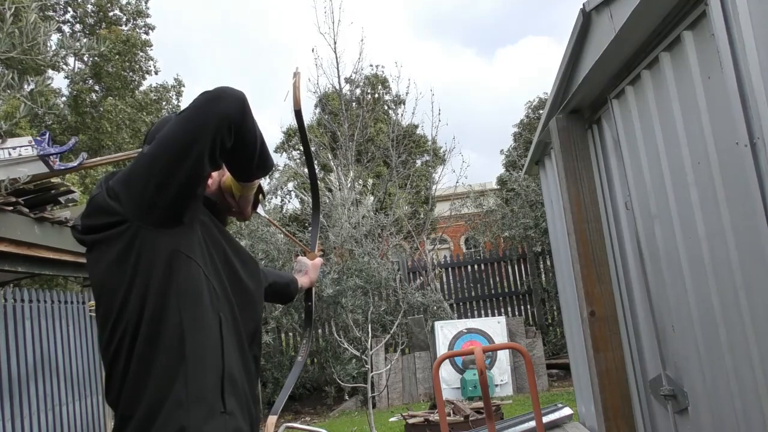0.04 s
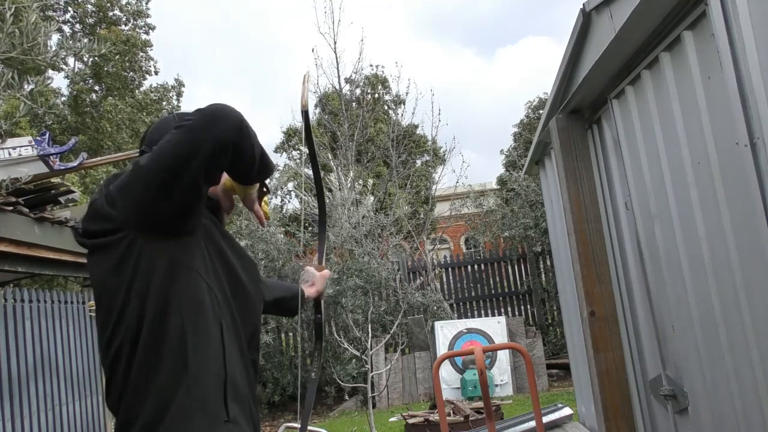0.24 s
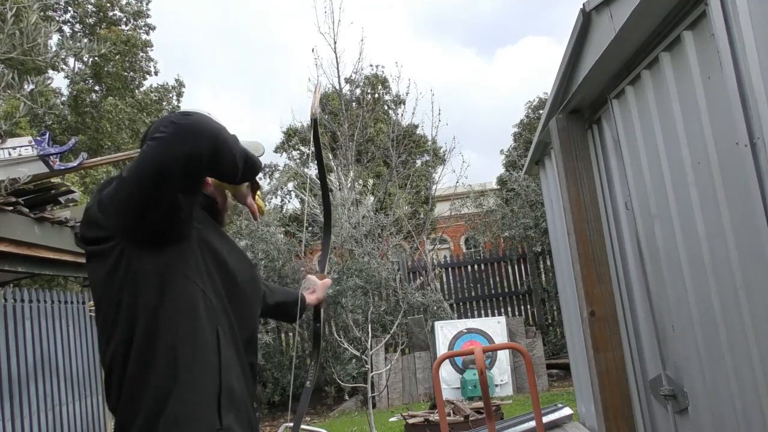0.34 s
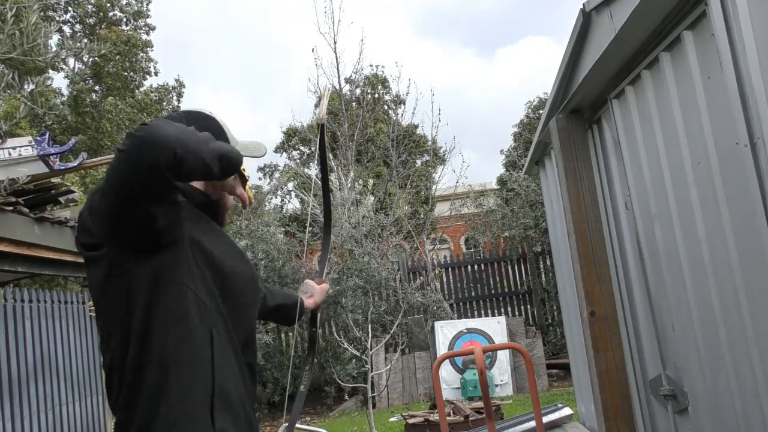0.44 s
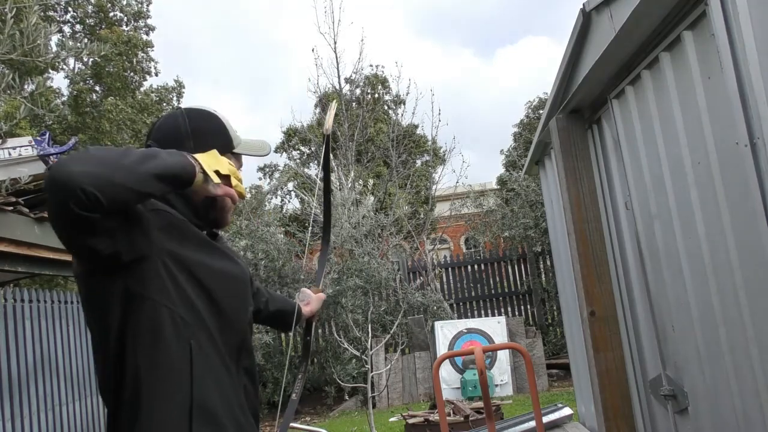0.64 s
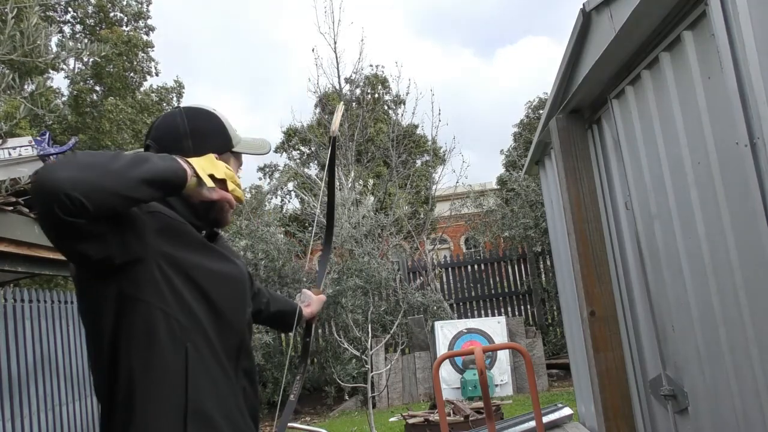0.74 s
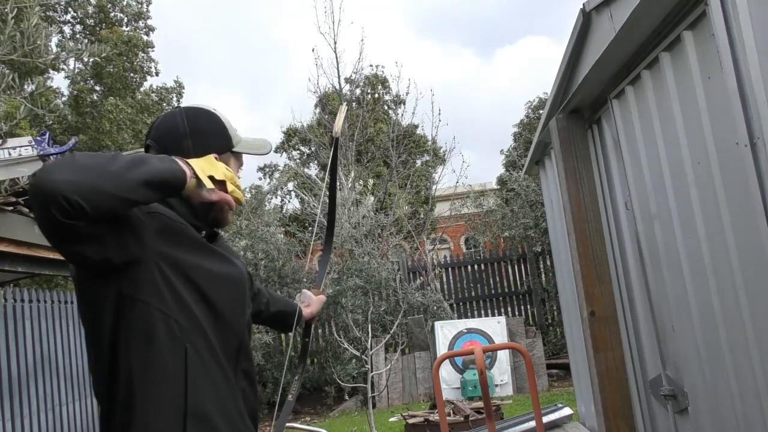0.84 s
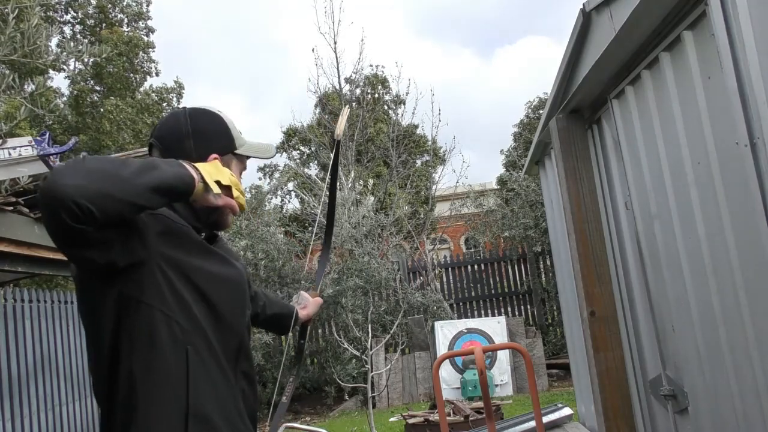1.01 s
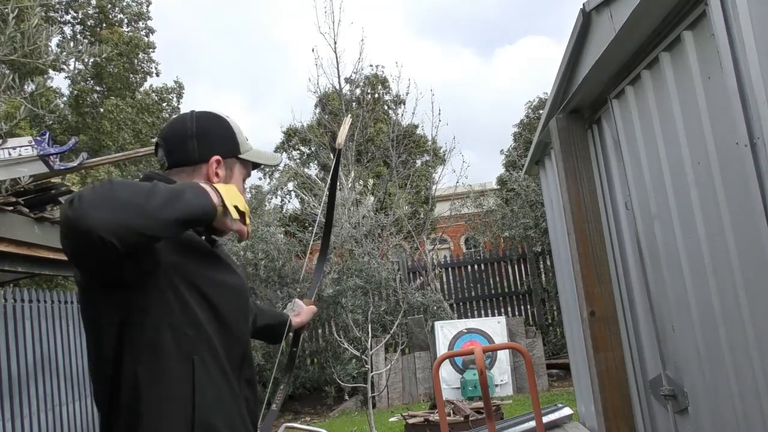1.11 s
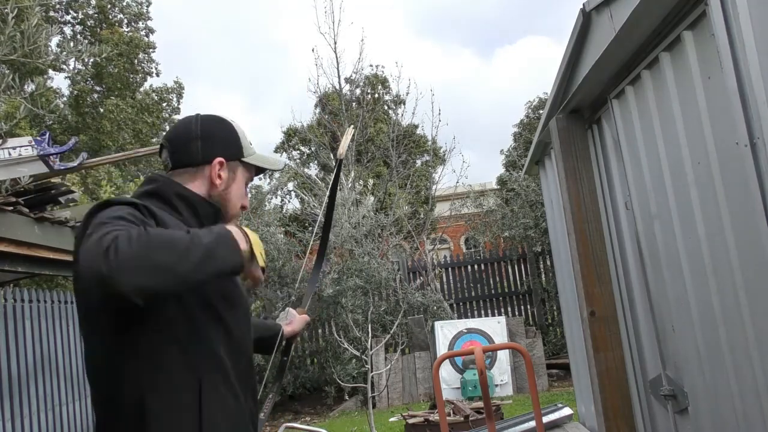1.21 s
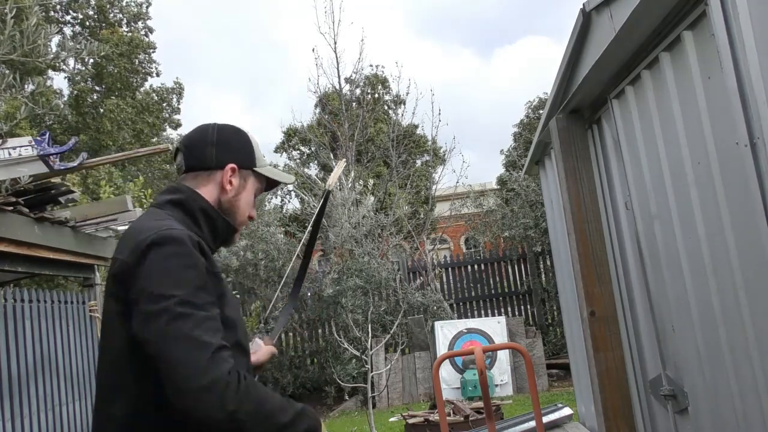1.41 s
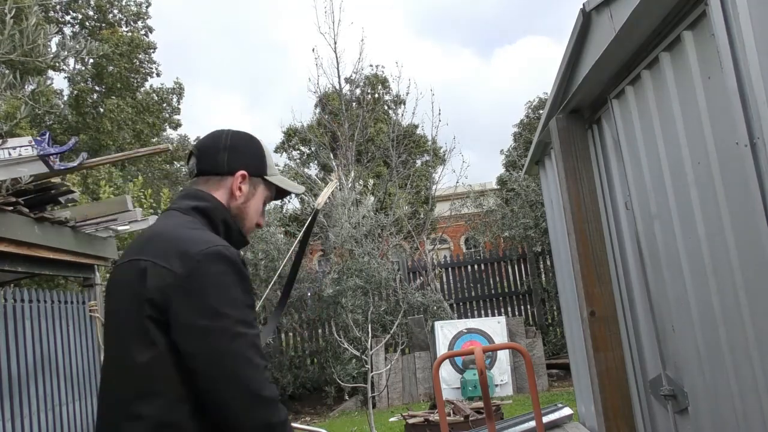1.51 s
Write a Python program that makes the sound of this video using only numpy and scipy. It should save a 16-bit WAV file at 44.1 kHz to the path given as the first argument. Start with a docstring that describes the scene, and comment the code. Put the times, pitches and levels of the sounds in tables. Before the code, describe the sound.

A bow fires with a sharp string clack, and the arrow cracks into a foam target with an echoing thump. A jacket then swishes near the microphone, while birds chatter faintly to the right in a backyard.

```python
"""Backyard: an archer looses a recurve bow. The arrow scrapes off the rest, the string clacks home
and the limbs ring. 0.2 s later the point cracks into a foam target, whose damped modes thump;
shed, fences and houses throw the thump back. His jacket swishes as the arm drops and gear ticks.
A flock of birds chatters in short whistles from trees to the right, over faint outdoor air."""
import sys
import numpy as np
from scipy import signal
from scipy.fft import rfft, irfft, next_fast_len
from scipy.io import wavfile
from scipy.ndimage import uniform_filter1d

SR = 44100
rng = np.random.default_rng(int(sys.argv[2]) if len(sys.argv) > 2 else 0)


def transcribe(u):
    """Save the signal u as a 16-bit wav file named by the first command-line argument.

    u: samples, shape (n,) or (channels, n), limited to [-1, 1]; the rate is SR.
    q: integer samples, one column per channel.
    """
    v = np.clip(np.atleast_2d(u).T, -1, 1)
    q = np.round(v * 32767).astype(np.int16)
    wavfile.write(sys.argv[1], SR, q)


N = 68355

# left-right coherence of diffuse and of near sound: f/Hz, coherence
DIFFUSE_COHERENCE = [(30, 0.067), (100, 0.73), (500, 0.7), (1500, 0.56), (4000, 0.27), (12000, 1)]
NEAR_COHERENCE = [(200, 0.99), (2000, 0.85), (12000, 1)]


def amp(db):
    """dB to gain."""
    return 10 ** (np.asarray(db) / 20)


def unit(x):
    """Scale to rms 1."""
    return x / np.sqrt(np.mean(x ** 2) + 1e-20)


def along(points, hz):
    """Interpolate (f/Hz, value) points over log frequency."""
    f, v = np.transpose(points)
    return np.interp(np.log(hz + 1), np.log(f + 1), v)


def since(start_s):
    """Seconds since start_s, zero before."""
    return np.maximum(np.arange(N) / SR - start_s, 0)


def fade(t, t60_s):
    """Exponential decay, 60 dB in t60_s."""
    return np.exp(-np.log(1000) * t / t60_s)


def filtered(x, response):
    """Apply the frequency response response(hz)."""
    size = next_fast_len(N + SR // 2)
    return irfft(rfft(x, size) * response(np.fft.rfftfreq(size, 1 / SR)), size)[..., :N]


def noise(colour_db, coherence):
    """Stereo noise, rms 1, with spectrum colour_db(hz)."""
    def mid_side_gains(hz):
        angle = np.arccos(np.clip(along(coherence, hz), -1, 1)) / 2
        return amp(colour_db(hz)) * [np.cos(angle), np.sin(angle)]
    mid, side = filtered(rng.standard_normal((2, N)), mid_side_gains)
    return unit(np.array([mid + side, mid - side]))


def puff(start_s, db, pitch_hz, t60_s, half_width_oct=0.8):
    """Decaying noise band around one pitch."""
    def band_db(hz):
        return -10 * np.log10(1 + (np.log2((hz + 1) / pitch_hz) / half_width_oct) ** 4)
    t = since(start_s)
    return amp(db) * (t > 0) * fade(t, t60_s) * noise(band_db, NEAR_COHERENCE)


def bursts(rows, colour, shelf_hz=6000):
    """Noisy contacts, each with its own attack, decay and treble shelf."""
    out = np.zeros((2, N))
    for start_s, db, attack_s, t60_s, treble_db in rows:
        t = since(start_s)
        hiss = noise(lambda hz: along(colour, hz) + treble_db * hz ** 4 / (hz ** 4 + shelf_hz ** 4),
                     NEAR_COHERENCE)
        out += amp(db) * (1 - np.exp(-t / attack_s)) * fade(t, t60_s) * hiss
    return out


def knocks(rows, colour, size=4096):
    """Hard contacts: one impulse each, ringing briefly in the body's colour."""
    cepstrum = irfft(np.log(amp(along(colour, np.fft.rfftfreq(size, 1 / SR)))))
    fold = np.r_[1, np.full(size // 2 - 1, 2), np.zeros(size // 2)]  # to minimum phase
    ring = irfft(np.exp(rfft(cepstrum * fold)))
    impulses = np.zeros(N)
    for start_s, db in rows:
        impulses[int(start_s * SR)] += amp(db)
    return signal.fftconvolve(impulses, ring / np.abs(ring).max())[:N]


def swell(start_s, hz, db, rise_s, sharpness):
    """Damped mode that peaks after rise_s and dies away."""
    t = since(start_s)
    envelope = (t / rise_s * np.exp(1 - t / rise_s)) ** sharpness
    return amp(db) * envelope * np.sin(2 * np.pi * hz * t)


def yard_tail(colour_db, build_s):
    """Diffuse response of the yard; each frequency decays at its own rate."""
    decay = [(120, 1), (300, 1), (600, 0.41), (1400, 0.4), (3500, 0.42), (10000, 0.31)]  # reverberation: f/Hz, t60/s
    hz, t, spectra = signal.stft(noise(colour_db, DIFFUSE_COHERENCE), SR, nperseg=512)
    _, tail = signal.istft(spectra * fade(t, along(decay, hz)[:, None]), SR, nperseg=512)
    return tail[:, :N] * (1 - np.exp(-since(0) / build_s))


def yard(x, wet_db, build_s=0.014):
    """The part of x scattered by the yard."""
    response = yard_tail(np.zeros_like, build_s)
    response /= np.linalg.norm(response[0])
    return amp(wet_db) * signal.fftconvolve(np.atleast_2d(x), response, axes=1)[:, :N]


def air(db=-51):
    """Faint, steady outdoor noise."""
    colour = [(15, -36), (30, -2.5), (60, -4.5), (140, -2), (450, -8.5), (800, -20), (1240, -10),
              (2600, -15), (4500, -10.5), (6200, -22), (11800, -25), (15500, -32)]  # spectrum: f/Hz, level/dB
    return amp(db) * noise(lambda hz: along(colour, hz), DIFFUSE_COHERENCE)


def chirp(start_s, length_s, db, start_hz, middle_hz, end_hz, roughness=0.022):
    """One arched whistle, slightly hoarse from pitch jitter."""
    u = np.linspace(0, 1, max(int(length_s * SR), 8))
    arch_hz = np.polyval(np.polyfit([0, 0.5, 1], [start_hz, middle_hz, end_hz], 2), u)
    jitter = unit(uniform_filter1d(rng.standard_normal(N // 4), size=30))[:len(u)]
    pitch_hz = arch_hz * (1 + roughness * jitter)
    envelope = np.sqrt(2 * np.abs(np.sin(np.pi * u)))
    call = amp(db) * envelope * np.sin(2 * np.pi * np.cumsum(pitch_hz) / SR)
    return np.pad(call, (max(int(start_s * SR), 0), N))[:N]


def birds(chirps_per_s=130, chirp_s=0.0241, centre_hz=3940, spread=0.16, glide=0.0795, pan_db=3):
    """Flock to the right: overlapping chirps blurred by distance, plus a few nearer calls."""
    levels = [(0, -44.5), (.15, -47.5), (.25, -45.5), (.39, -46.5), (0.468, -51), (.56, -43.5),
              (.63, -53.5), (.74, -50.5), (.98, -56), (1.09, -50), (1.16, -46.5), (1.21, -54.5),
              (1.26, -45.5), (1.35, -47), (1.45, -50), (1.55, -56)]  # flock loudness: t/s, level/dB
    colour = [(1500, -71), (2700, -6), (3150, 1), (3600, 1.5), (4600, -1), (5300, -5), (6500, -13),
              (9000, -41)]  # flock spectrum: f/Hz, level/dB
    calls = [(0.554, 0.027, -55, 4070, 4370, 4050), (.556, 0.06, -49.5, 3620, 3490, 3220),
             (.628, 0.065, -51.5, 3250, 3090, 3180), (.697, 0.032, -53, 5230, 4780, 4700),
             (0.71, .038, -56.5, 6150, 5910, 5820), (0.868, 0.038, -55, 5050, 5330, 5340),
             (0.988, 0.024, -54, 6050, 5320, 4000), (1.337, .025, -52.5, 5280, 5340, 5230),
             (1.393, .016, -45.5, 5000, 3944, 3550), (1.421, 0.03, -45, 3430, 3894, 3490),
             (1.423, .055, -48.5, 4500, 4760, 4620), (1.069, .04, -55.5, 4640, 4776, 4700)]  # near calls: t/s, length/s, level/dB, start/Hz, middle/Hz, end/Hz
    draws = rng.standard_normal((int(chirps_per_s * N / SR), 5))
    flock = np.zeros(N)
    for k, draw in enumerate(draws):
        start_s = (k + rng.random()) / chirps_per_s
        level_db = 3 * draw[0]
        contour_hz = centre_hz * np.exp(spread * draw[1] + glide * draw[2:])
        flock += chirp(start_s, chirp_s, level_db, *contour_hz)
    flock = unit(filtered(flock + yard(flock, wet_db=-1.5), lambda hz: amp(along(colour, hz))))
    murmur = amp(-5.5) * noise(lambda hz: along(colour, hz), DIFFUSE_COHERENCE)
    chatter = amp(np.interp(since(0), *np.transpose(levels))) * unit(flock + murmur)
    near = sum(chirp(*row) for row in calls)
    return (chatter + near + yard(near, wet_db=-4, build_s=0.0031)) * amp([[-pan_db], [pan_db]])


def archer():
    """The sleeve swishes, gear ticks and the archer shifts with soft low bumps."""
    strokes = [(.583, -46, 0.0062, 0.34, -17), (.7565, -34.5, 0.0025, 0.14, 3.5),
               (.773, -33, 0.0014, 0.17, 1.5), (.895, -42, 0.016, 0.23, -10),
               (.928, -41.5, 0.0085, 0.12, 14), (.99, -49.5, 0.011, 0.29, 1),
               (1.215, -44, 0.0067, 0.17, -8.5)]  # sleeve strokes: t/s, level/dB, attack/s, t60/s, treble/dB
    cloth_colour = [(300, 5), (800, -8.5), (2000, 1.5), (4000, -2), (6000, 0), (10000, 2.5), (13000, 3.5),
                    (15500, -10)]  # jacket spectrum: f/Hz, level/dB
    gear = [(0.914, -41.5, 580, 0.037), (1.003, -31, 12500, 0.0028), (1.0245, -26.5, 13200, 0.0035),
            (1.148, -46, 900, 0.045)]  # gear ticks: t/s, level/dB, f/Hz, t60/s
    shifts = [(1.068, -43.5, 135, 0.013), (1.12, -39, 95, 0.0096), (1.054, -47, 44.8, 0.049)]  # body bumps: t/s, level/dB, f/Hz, rise/s
    cloth = bursts(strokes, cloth_colour)
    ticks = sum(puff(*row) for row in gear)
    bumps = sum(swell(start_s, hz, db, rise_s, sharpness=2.5) for start_s, db, hz, rise_s in shifts)
    return cloth + yard(cloth, wet_db=-10.5) + ticks + bumps


def target(hit_s=0.4275, boom_gain_db=-32):
    """The point cracks into the face and the foam block thumps; the yard echoes and booms."""
    strikes = [(.4279, -11.5), (.4316, -24)]  # point on face, then core: t/s, peak/dB
    pierce = [(.4278, -22, 0.0001, 0.016, 2), (.4312, -24.5, 0.00013, 0.047, 3)]  # face tearing: t/s, level/dB, attack/s, t60/s, treble/dB
    crack_colour = [(500, -1.5), (850, -8), (1500, 1.5), (2200, 3.5), (3700, -2.5), (4600, -12),
                    (6200, -14), (15500, -35)]  # crack spectrum: f/Hz, level/dB
    block_modes = [(129, -12.5, 0.014, 3), (344.6, -16, 0.0048, 4.5), (321.4, -35.5, .014, 0.94),
                   (392.5, -36, 0.018, 0.76), (77, -33, 0.011, 0.64), (600, -37, 0.0051, 1.4)]  # foam block: f/Hz, level/dB, rise/s, sharpness
    walls = [(.034, -18, 156.2), (.058, -29, 144), (0.115, -33, 133), (.141, -32.5, 227), (0.172, -33, 253),
             (0.193, -22, 143.4), (0.225, -35.5, 128.5), (0.25, -35, 131.6), (.335, -41, 145)]  # one echo per surface: delay/s, level/dB, f/Hz
    boom_colour = [(55, -26), (90, 2), (130, 7), (190, 3.5), (240, -1.5), (290, -6.5), (360, -2.5),
                   (470, -10.5), (700, -23.5), (950, -12), (1500, -20.5), (4000, -34.5)]  # diffuse thump spectrum: f/Hz, level/dB
    crack = knocks(strikes, crack_colour) + bursts(pierce, crack_colour)
    thump = sum(swell(hit_s, *mode) for mode in block_modes)
    echoes = sum(swell(hit_s + delay_s, hz, db, rise_s=0.015, sharpness=5.7) for delay_s, db, hz in walls)
    boom = amp(boom_gain_db) * yard_tail(lambda hz: along(boom_colour, hz), build_s=0.0031)
    boom = np.pad(boom, ((0, 0), (int(hit_s * SR), 0)))[:, :N]
    return crack + yard(crack, wet_db=-12.5) + thump + echoes + boom


def bow(release_s=0.2195, string_home_s=0.2378, ring_gain_db=-37):
    """The string whips the air, the arrow scrapes off, the string slams home and the bow rings."""
    ring_modes = [(1118, -6, .09), (1174, -9, .08), (2216, -2, .16), (2379, -5, .15), (2478, -4, .16),
                  (2749, -3, .15), (2848, -3, .16), (3065, -4, .15), (3177, -4, .13), (3411, -5, .14)]  # limbs, string and shaft: f/Hz, level/dB, t60/s
    limb_modes = [(126, -33, 0.0041, 1.2), (110, -54.5, 0.029, 0.49)]  # heavily damped push of the limbs: f/Hz, level/dB, rise/s, sharpness
    scrapes = [(.2195, -26.5, 0.0014, 0.024, 0), (.2231, -20, 0.00025, 0.016, 3),
               (.225, -18, 0.00019, 0.021, 4), (.2278, -27.5, 0.00042, 0.15, -2),
               (.2378, -16.5, 0.00011, 0.014, 8), (.2395, -22.5, 0.00056, 0.09, -1.5)]  # string and arrow on the bow: t/s, level/dB, attack/s, t60/s, treble/dB
    scrape_colour = [(60, -48), (130, -13.5), (500, -3), (750, -16), (1100, 2.5), (1600, -5), (2400, -1),
                     (3900, -2), (6500, -12), (11500, -13), (15500, -27)]  # scrape spectrum: f/Hz, level/dB
    clacks = [(.2251, -22), (.2279, -18), (.2378, -4.5), (.2466, -15.5)]  # knocks of nock, shaft and string: t/s, peak/dB
    clack_colour = [(100, -28), (1150, -7), (1650, -10.5), (2400, 9), (3300, 4), (5600, -17.5),
                    (11500, -10), (15500, -16)]  # knock spectrum: f/Hz, level/dB
    t = since(string_home_s)
    ring = np.zeros(N)
    for hz, db, t60_s in ring_modes:
        envelope = amp(ring_gain_db + db + rng.normal(0, 1)) * fade(t, t60_s) * (t > 0)
        ring += envelope * np.sin(2 * np.pi * hz * t + rng.uniform(0, 2 * np.pi))
    whip = puff(release_s, db=-34.5, pitch_hz=480, t60_s=0.058)
    shot = whip + bursts(scrapes, scrape_colour) + knocks(clacks, clack_colour) + ring
    push = sum(swell(string_home_s, *mode) for mode in limb_modes)
    return shot + yard(shot, wet_db=-12) + push


def scene():
    """Shot, hit and archer over outdoor air and birds."""
    return bow() + target() + archer() + air() + birds()


def record(dry):
    """Band-limited stereo microphone; the left port hears slightly ahead of the right."""
    top_hz, lead_s = 16000, 12e-6
    advance_s = np.array([[lead_s], [-lead_s]]) / 2
    return filtered(dry, lambda hz: (hz < top_hz) * np.exp(2j * np.pi * hz * advance_s))


dry = scene()
out = record(dry)
transcribe(out)
```